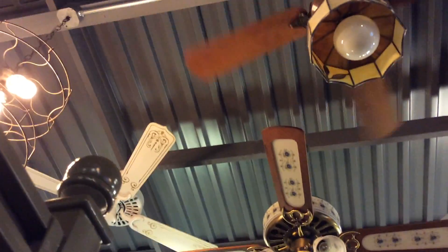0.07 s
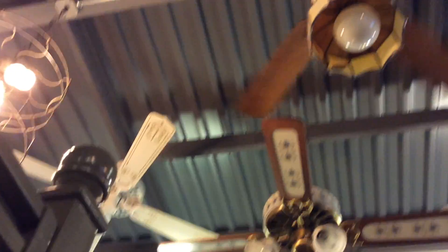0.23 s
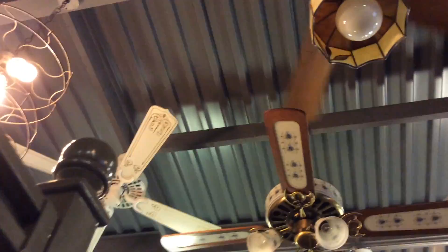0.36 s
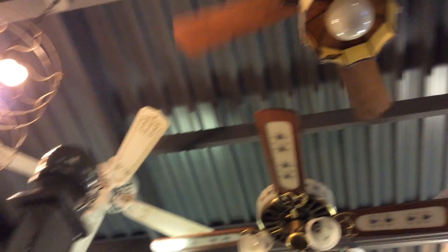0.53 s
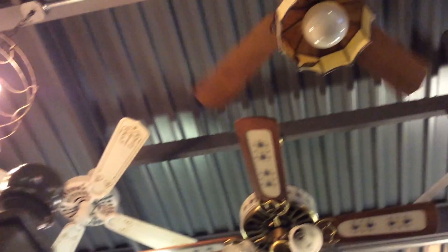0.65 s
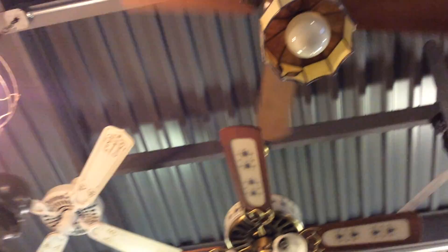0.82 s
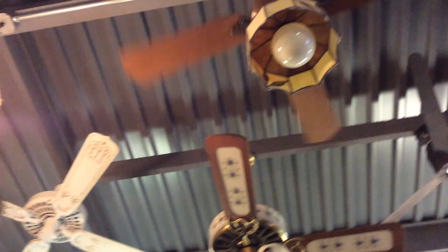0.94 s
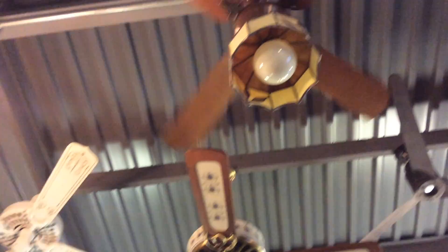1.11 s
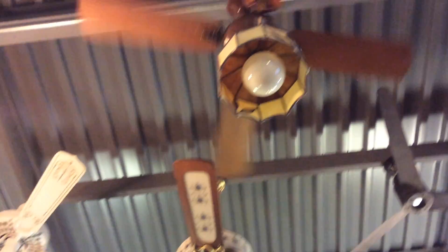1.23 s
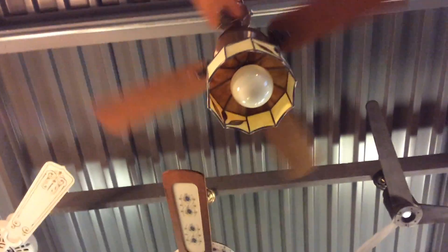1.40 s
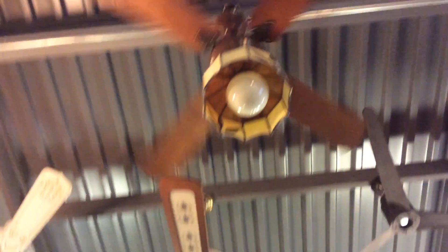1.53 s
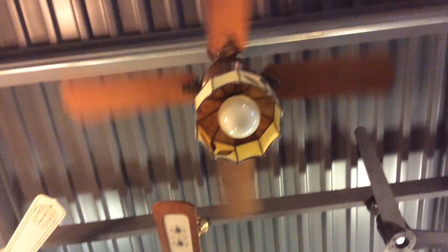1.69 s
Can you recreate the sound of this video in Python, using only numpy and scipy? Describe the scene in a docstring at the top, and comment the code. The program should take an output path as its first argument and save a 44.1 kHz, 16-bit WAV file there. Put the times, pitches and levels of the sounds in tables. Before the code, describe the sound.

A finger knocks sharply on a handheld camera once, then the grip rustles faintly and a softer, dull bump follows. The handling is close and dry, over the faint hum of ceiling fans in a quiet hall.

```python
"""Camera handling in a quiet hall.

Slow ceiling fans give a low rush of air and a wavering motor hum. A finger knocks the case of a
hand-held camera once, sharply, then bumps it softly and scuffs along it. Each knock is a pressure
pulse coloured by the case. The grip rustles in tiny slips and the case ticks under it."""
import sys
import numpy as np
from scipy import signal
from scipy.fft import rfft, irfft
from scipy.io import wavfile

SR = 44100
rng = np.random.default_rng(int(sys.argv[2]) if len(sys.argv) > 2 else 0)


def int16_out(signal):
    """Quantize to a 16-bit WAV file."""
    q = np.round(np.clip(np.atleast_2d(signal).T, -1, 1) * 32767)
    wavfile.write(sys.argv[1], SR, q.astype(np.int16))


N = 77175
TIME_S = np.arange(N) / SR


def from_db(db):
    """Decibels to gain."""
    return 10 ** (np.asarray(db) / 20)


def unit_rms(x):
    """Scale to rms 1."""
    return x / np.sqrt(np.mean(x ** 2) + 1e-20)


def one_pole(x, cutoff_hz, kind):
    """First-order low- or high-pass."""
    return signal.sosfilt(signal.butter(1, cutoff_hz, kind, fs=SR, output="sos"), x + 1e-18)


def bell(x, centre_hz, gain_db, q):
    """One resonant peak or dip."""
    omega = 2 * np.pi * centre_hz / SR
    half_gain = from_db(gain_db / 2)
    alpha = abs(np.sin(omega)) / (2 * q)
    b = [1 + alpha * half_gain, -2 * np.cos(omega), 1 - alpha * half_gain]
    a = [1 + alpha / half_gain, -2 * np.cos(omega), 1 - alpha / half_gain]
    return signal.lfilter(b, a, x + 1e-18)


def coloured(noise, spectrum):
    """Shape noise by rows of freq_hz, density_db; rms 1."""
    freq_hz, density_db = np.transpose(spectrum)
    bins_hz = np.maximum(np.arange(N // 2 + 1) * SR / N, 1)
    gain = from_db(np.interp(np.log(bins_hz), np.log(freq_hz), density_db))
    gain *= np.minimum(bins_hz / freq_hz[0], 1)
    return unit_rms(irfft(rfft(noise) * gain, N))


def decay(start_s, t60_s):
    """Envelope that jumps to 1 and dies away."""
    return (TIME_S >= start_s) * np.exp(-np.log(1000) * np.abs(TIME_S - start_s) / t60_s)


def fans():
    """Steady moving air and gently wavering motor hum."""
    # hall air with microphone hiss: freq_hz, density_db
    air_spectrum = [(25, -10), (50, -6), (90, 0), (190, -3), (270, -5.5), (380, -14), (500, -15.5),
                    (800, -20.5), (1600, -27), (2600, -27), (4000, -29.5), (5500, -31), (8000, -33.5),
                    (15000, -34.5)]
    # motor hum partials: freq_hz, rms_db
    hum_partials = [(119.5, -79), (360, -89), (479.5, -85.5), (840, -96), (959, -96.5)]
    air_db, waver_db, waver_step_s = -69, 5, .15
    out = from_db(air_db) * coloured(rng.standard_normal(N), air_spectrum)
    for freq_hz, rms_db in hum_partials:
        waver = np.interp(TIME_S / waver_step_s, np.arange(100), rng.standard_normal(100))
        amplitude = np.sqrt(2) * from_db(rms_db + waver_db * waver)
        out += amplitude * np.sin(2 * np.pi * (freq_hz * TIME_S + rng.random()))
    return out


def knocks():
    """Pressure builds as the finger pushes, flips as the case springs back, and leaks away."""
    # finger contacts, softened by skin: time_s, drive_db, brightness_hz, cushion_hz
    contacts = [(0.2428, -5, 1350, 12030), (0.4696, -15.5, 224, 416), (0.4838, -18.5, 256, 590),
                (0.492, -26.5, 387, 890), (0.501, -34, 400, 900)]
    # peaks and dips of the case: centre_hz, gain_db, q
    case_response = [(265, -2, 0.62), (930, -15, 2.1), (1276, 2, 3), (2142, -13.5, 2.7), (3030, 7.5, 2.5),
                     (3560, -14.5, 7), (4560, -7.5, 36), (7400, -0.5, 12), (10600, -14.5, 4)]
    press_s, release_s, leak_hz = .0015, .0014, 63.5
    out = np.zeros(N)
    for time_s, drive_db, brightness_hz, cushion_hz in contacts:
        offset_s = np.abs(TIME_S - time_s)
        press = np.exp(-offset_s / press_s) * release_s / press_s
        release = -np.exp(-offset_s / release_s)
        pulse = one_pole(np.where(TIME_S < time_s, press, release), brightness_hz, "low")
        out += from_db(drive_db) * one_pole(pulse, cushion_hz, "low")
    for centre_hz, gain_db, q in case_response:
        out = bell(out, centre_hz, gain_db, q)
    return one_pole(out, leak_hz, "high")


def scuffs():
    """Dull friction that dies away as the finger comes to rest."""
    # skin dragging after a knock: start_s, level_db, t60_s
    drags = [(0.243, -39.5, 0.071), (0.259, -48, 0.071), (0.479, -42, 0.12), (0.504, -49, .07)]
    # skin friction: freq_hz, density_db
    friction_spectrum = [(50, -13), (150, 3), (350, -2), (600, -11), (900, -9.5), (1250, -18), (1700, -21),
                         (3000, -28), (6000, -35.5), (14000, -45)]
    attack_s = .005
    envelope = np.zeros(N)
    for start_s, level_db, t60_s in drags:
        attack = np.clip((TIME_S - start_s) / attack_s, 0, 1)
        envelope += from_db(level_db) * attack * decay(start_s, t60_s)
    return envelope * coloured(rng.standard_normal(N), friction_spectrum)


def rustles():
    """Each shift of the grip is a short run of tiny slips over a smooth hiss."""
    # grip shifts: start_s, length_s, level_db
    shifts = [(0.272, 0.038, -72), (0.313, 0.039, -69.5), (0.354, 0.012, -65.5), (0.369, 0.02, -73.5),
              (0.388, 0.012, -64.5), (0.403, 0.01, -71), (0.415, 0.067, -77.5), (1.194, .07, -84.5),
              (1.531, 0.095, -75.5), (1.668, .016, -80), (1.725, .03, -78)]
    # grip friction: freq_hz, density_db
    grip_spectrum = [(300, -8.5), (800, -0.5), (1700, -3), (3000, 0.5), (5500, -3.5), (8000, -8),
                     (12000, -9.5), (15000, -13)]
    edge_s, slips_per_s, spread_db, hiss_gain = .004, 2500, 4, 0.56
    sizes = from_db(spread_db * np.minimum(rng.exponential(1, N), 4))
    signs = rng.choice([-1, 1], N)
    slipping = rng.random(N) < slips_per_s / SR
    friction = unit_rms(sizes * signs * slipping) + hiss_gain * rng.standard_normal(N)
    envelope = np.zeros(N)
    for start_s, length_s, level_db in shifts:
        inside_s = np.minimum(TIME_S - start_s, start_s + length_s - TIME_S)
        envelope += from_db(level_db) * np.clip(inside_s / edge_s + .5, 0, 1)
    return envelope * coloured(friction, grip_spectrum)


def ticks():
    """The case crackles under the grip: brief noise bursts, each with one broad resonance."""
    # case ticks: start_s, level_db, pitch_hz
    case_ticks = [(0.287, -57.5, 2020), (0.324, -63, 5370), (0.339, -62, 3500), (0.3582, -61, 2590),
                  (0.366, -62, 2150), (0.3927, -52.5, 2380), (0.3967, -50, 2530), (0.4695, -63, 4500),
                  (1.401, -58, 4140), (1.539, -65, 5400), (1.6086, -65.5, 3660), (1.737, -61, 7400),
                  (1.7402, -69, 7400)]
    out = np.zeros(N)
    for start_s, level_db, pitch_hz in case_ticks:
        noise = one_pole(rng.standard_normal(N), 0.67 * pitch_hz, "high")
        crackle = unit_rms(bell(noise, pitch_hz, gain_db=22.5, q=0.88))
        out += from_db(level_db) * decay(start_s, t60_s=0.0095) * crackle
    return out


def scene():
    """Handling sounds reach the microphone dry, through the case, over the fans; mono."""
    return (fans() + knocks() + scuffs() + rustles() + ticks())[None]


def record(dry):
    """The microphone rolls off the lowest rumble; the top is cut steeply."""
    rumble_cut_hz, top_cut_hz = 31, 15300
    thinned = one_pole(dry, rumble_cut_hz, "high")
    return signal.sosfilt(signal.ellip(12, .1, 80, top_cut_hz, fs=SR, output="sos"), thinned)


dry = scene()
out = record(dry)
int16_out(out)
```